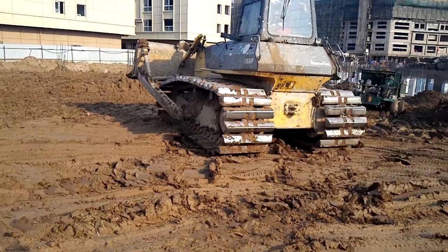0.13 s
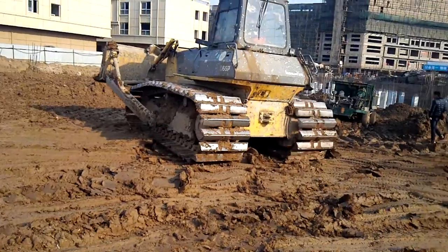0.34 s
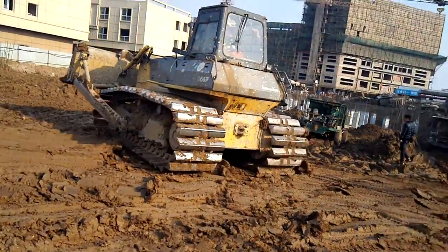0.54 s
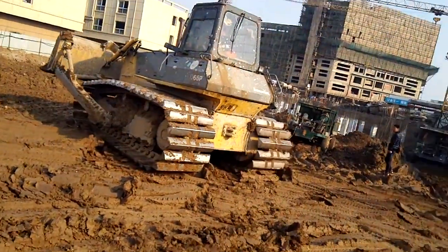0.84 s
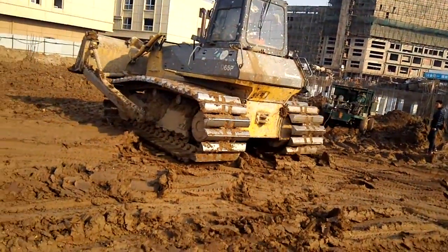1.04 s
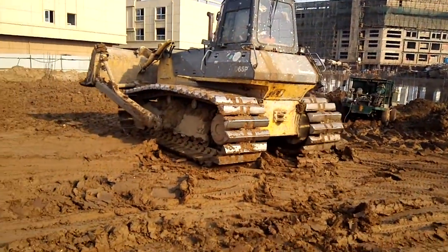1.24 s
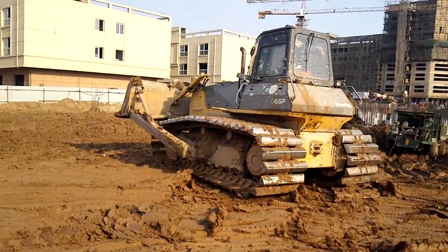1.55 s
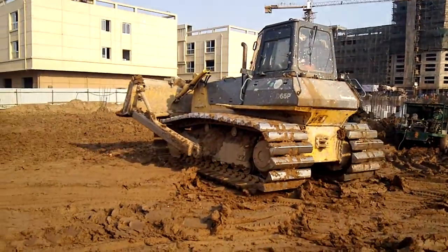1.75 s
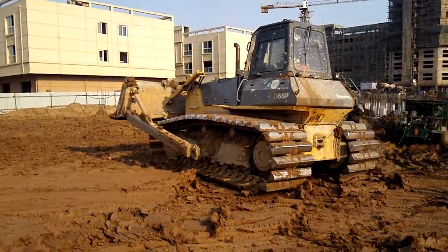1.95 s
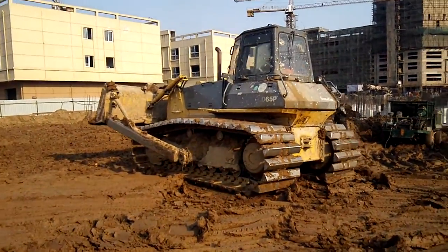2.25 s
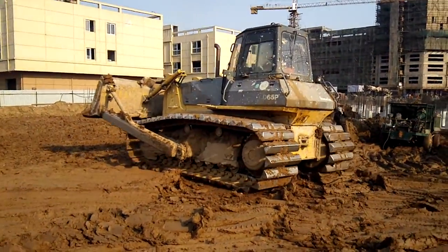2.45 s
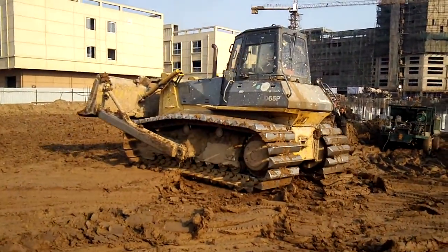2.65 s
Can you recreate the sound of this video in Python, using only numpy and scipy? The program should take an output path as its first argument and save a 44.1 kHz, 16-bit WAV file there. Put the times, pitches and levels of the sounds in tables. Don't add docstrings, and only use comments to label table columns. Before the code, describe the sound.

Bulldozer rolling past on mud, heavy diesel drone with rhythmic track grinding, metallic ticks and squeaks

```python
import sys
import numpy as np
from scipy import signal
from scipy.fft import rfft, irfft, next_fast_len
from scipy.io import wavfile

SR = 44100
rng = np.random.default_rng(int(sys.argv[2]) if len(sys.argv) > 2 else 0)


def invert_db(level):
    return 10 ** (np.asarray(level, dtype=float) / 20)


def wrap_up_sound(samples):
    columns = np.atleast_2d(samples).T
    tamed = np.clip(columns, -1, 1)
    steps = np.round(tamed * 32767).astype(np.int16)
    wavfile.write(sys.argv[1], SR, steps)


N = 123039
FIRING_HZ = 80.56
GRAIN_SPREAD_DB = 4.5


def rms_one(x):
    return x / np.sqrt(np.mean(x ** 2) + 1e-20)


def at_hz(points, hz):
    points = np.array(points)
    return np.interp(np.log(hz + 1), np.log(points[:, 0]), points[:, 1])


def drift(rate_hz):
    r = np.exp(-2 * np.pi * rate_hz * 40 / SR)
    slow = signal.lfilter([1], [1, -2 * r, r * r], rng.standard_normal(N // 40 + 2002))[2000:]
    return np.interp(np.arange(N) / 40, np.arange(len(slow)), rms_one(slow))


def ring(clicks, hz, t60_s):
    r = invert_db(-60 / (t60_s * SR))
    w = 2 * np.pi * hz / SR
    return signal.lfilter([0, np.sin(w)], [1, -2 * r * np.cos(w), r * r], clicks + 1e-18)


def tone(hz, rms_db):
    cycles = np.cumsum(hz * np.ones(N)) / SR + rng.random()
    return np.sqrt(2) * invert_db(rms_db) * np.sin(2 * np.pi * cycles)


def swell(start_s, length_s, power=2):
    out, first = np.zeros(N), int(start_s * SR)
    part = out[first:first + int(length_s * SR)]
    along = np.arange(len(part)) / (length_s * SR)
    skew = 0.95
    part[:] = np.abs(np.sin(np.pi * along ** skew)) ** power
    return out


def patchy_noise(spectrum, low_hz, high_hz):
    hz, out = np.fft.rfftfreq(N, 1 / SR), 0
    white = rfft(rng.standard_normal((3, N)))
    coloured = white * invert_db(at_hz(spectrum, hz)) * (hz > low_hz) * (hz < high_hz)
    half_octaves = 2 * np.log2(hz + 1)
    for centre in np.arange(np.floor(2 * np.log2(low_hz)), 2 * np.log2(high_hz) + 1):
        band = np.cos(np.pi / 2 * np.clip(half_octaves - centre, -1, 1)) ** 2
        out = out + irfft(coloured * band, N) * invert_db(1.71 * drift(4.9))
    return rms_one(out)


def engine_noise():
    # hz, level_db (per Hz)
    roar_spectrum = [(20, -21), (30, -18), (60, -5), (113, -3.5), (151, 0), (212, -5.5), (284, -5),
                     (454, -11.5), (1000, -10.5)]
    # hz, level_db (per Hz)
    clatter_spectrum = [(1000, 0.5), (3000, -2), (4000, -5.5), (4900, -15), (8500, -6.5), (10700, -12),
                        (11200, -15.5), (14500, -34)]
    firing_phase = np.arange(N) / SR * FIRING_HZ % 1
    knock = 1 + 0.1 * (1 - 2 * firing_phase)
    roar = invert_db(-24) * patchy_noise(roar_spectrum, 20, 1000)
    clatter = invert_db(-21.5) * knock * patchy_noise(clatter_spectrum, 1000, 15000)
    return roar + clatter


def moving_lines(lines, base_hz):
    along, out = np.arange(N) / N, np.zeros(N)
    for multiple, first_db, last_db in lines:
        glide_db = first_db + (last_db - first_db) * along
        out += tone(multiple * base_hz, glide_db + 0.7 * drift(3.0))
    return out


def exhaust():
    # multiple (of the firing rate), first_db, last_db (rms)
    exhaust_lines = [(.5, -50, -42), (.7, -48, -39), (1, -25, -26), (7 / 6, -39, -46), (1.5, -44, -38),
                     (2, -22, -27), (7 / 3, -46, -39), (2.5, -36, -41), (8 / 3, -40, -41),
                     (10 / 3, -41, -33), (4, -45, -39), (4.7, -43, -50), (5, -46, -45), (6.5, -50, -43),
                     (10, -52, -42), (11, -49, -39), (13.5, -48, -48), (14, -48, -46), (14.5, -45, -44),
                     (15, -45, -45), (15.5, -50, -45)]
    return moving_lines(exhaust_lines, FIRING_HZ)


def fan():
    # multiple (of the blade rate), first_db, last_db (rms)
    fan_lines = [(1, -32, -23), (2, -40, -30), (3, -41, -50), (4, -45, -46), (5, -48, -45), (6, -47, -46)]
    return moving_lines(fan_lines, 142.8)


def gears():
    # pitch_hz, width_hz, first_db, last_db (rms)
    gear_whines = [(756, 20, -38, -46), (670, 30, -46, -35), (640, 30, -40, -44), (1545, 50, -32, -46),
                   (1663, 15, -43, -35), (1310, 30, -44, -41), (2260, 60, -44, -35), (2110, 60, -46, -37)]
    out = np.zeros(N)
    for hz, width_hz, first_db, last_db in gear_whines:
        whine = rms_one(ring(rng.standard_normal(N), hz, 2.9 / width_hz))
        out += invert_db(np.linspace(first_db, last_db, N) + 3.2 * drift(1.0)) * whine
    return out


def turbo():
    # time_s, pitch_hz
    whistle_path = [
        (0.13, 10560),
        (0.6, 10670),
        (1.0, 10710),
        (1.8, 10760),
        (2.3, 10720),
        (2.79, 10730),
    ]
    whistle_hz = np.interp(np.arange(N) / SR, *np.transpose(whistle_path)) + 22 * drift(40.3)
    out = np.zeros(N)
    for below_hz, relative_db in ((0, 0), (180, -6)):
        out += tone(whistle_hz - below_hz, -33 + relative_db + 3.0 * drift(11.4))
    return out


def struck(blows):
    out, t = np.zeros(N + SR), np.arange(SR // 4) / SR
    bright = signal.butter(2, [3400, 12500], "band", fs=SR, output="sos")
    for start_s, ring_db, hz, t60_s, crack_db in blows:
        shape = (1 - np.exp(-t / 0.00059)) * invert_db(-60 * t / t60_s)
        pair = np.sin(2 * np.pi * hz * t) + 0.87 * np.sin(2 * np.pi * (hz * 1.03 * t + rng.random()))
        crack = signal.sosfilt(bright, rng.standard_normal(len(t)))
        out[int(start_s * SR):][:len(t)] += shape * (invert_db(ring_db) * pair + invert_db(crack_db) * crack)
    return out[:N]


def thuds():
    # start_s, peak_db, pitch_hz, t60_s
    frame_thuds = [
        (1.46, -14, 330, .1),
        (1.605, -17.5, 218, 0.17),
        (1.865, -14, 804, 0.16),
        (2.56, -23, 1240, .1),
    ]
    return struck([(*row, -80) for row in frame_thuds])


def ticks():
    # start_s, peak_db, pitch_hz
    pin_ticks = [(0.407, -7, 8500), (.584, -9, 7600), (0.714, -7, 2800), (0.7655, -8.5, 7800),
                 (.8086, -6, 8000), (.8895, -9, 8900), (1.040, -9.5, 8000), (1.072, -9, 8580),
                 (1.1727, -3.5, 2870), (1.467, -7, 8700), (1.605, -6.5, 8400), (1.7233, -2.5, 8300),
                 (2.2384, -9.5, 9000), (2.2947, -10, 9050)]
    return struck([(start_s, db - 5.5, hz, 0.04, db - 3) for start_s, db, hz in pin_ticks])


def rattles():
    # start_s, length_s, level_db, pitch_hz
    pin_rattles = [(.345, 0.023, -26, 6170), (.35, 0.026, -24.5, 4270), (.626, 0.038, -28, 7660),
                   (.639, 0.019, -15.5, 8700), (.645, 0.019, -19.5, 4200), (.808, 0.0076, -15.5, 3860),
                   (.81, 0.013, -29, 5300), (.888, .012, -26, 5650), (.925, .035, -26, 7900),
                   (.927, .012, -22, 9900), (.93, 0.037, -21, 3680), (1.038, .016, -21.5, 7730),
                   (1.105, 0.024, -31, 7260), (1.173, 0.011, -24, 5800), (1.198, 0.016, -19.5, 6340),
                   (1.218, 0.012, -21, 5870), (1.215, 0.019, -20, 1700), (1.47, .045, -33, 10200),
                   (1.475, 0.032, -27, 5980), (1.49, .03, -20, 1940), (1.725, 0.022, -21, 3800),
                   (1.732, .01, -17.5, 8550), (1.762, 0.012, -19.5, 10160), (1.765, 0.031, -22.5, 5930),
                   (1.772, 0.025, -27, 9600), (1.77, 0.032, -22, 1505), (1.87, 0.058, -24, 7900),
                   (2.04, 0.019, -23.5, 8200), (2.04, 0.01, -29, 9100), (2.60, 0.059, -26, 2090),
                   (2.72, .035, -26, 3700), (2.722, 0.028, -24, 8860), (2.752, .04, -20, 9300)]
    out, t = np.zeros(N + SR), np.arange(SR // 8) / SR
    rise_s, fall_s, relative_width = 0.002, 0.006, 0.07
    for start_s, length_s, db, hz in pin_rattles:
        shape = (1 - np.exp(-t / rise_s)) * np.exp(-np.maximum(t - length_s, 0) / fall_s)
        blows = rng.standard_normal(len(t)) * invert_db(GRAIN_SPREAD_DB * rng.standard_normal(len(t)))
        edges_hz = hz * (1 + relative_width * np.array([-.5, .5]))
        body = signal.butter(2, edges_hz, "band", fs=SR, output="sos")
        out[int(start_s * SR):][:len(t)] += invert_db(db) * shape * rms_one(signal.sosfilt(body, blows))
    return out[:N]


def squeaks():
    # start_s, length_s, low_mode_db, high_mode_db
    bushing_squeaks = [(0.194, 0.032, -25, -40), (.225, .035, -38, -48), (0.322, 0.048, -40, -30),
                       (0.494, .03, -34, -32), (0.515, 0.041, -25, -33), (.575, .03, -28, -45),
                       (0.706, 0.037, -45, -36), (0.764, 0.023, -29, -44), (0.804, 0.027, -28.5, -48),
                       (.88, 0.045, -31, -36), (.915, 0.063, -28, -43), (1.12, 0.044, -34, -45),
                       (1.154, 0.11, -45, -37), (1.37, 0.078, -50, -32), (1.602, 0.045, -32, -36),
                       (1.622, 0.048, -25, -17), (1.885, 0.069, -33.5, -30), (2.136, .09, -46, -32),
                       (2.178, .03, -32, -50), (2.28, 0.027, -30, -42), (2.387, .05, -40, -38),
                       (2.494, 0.062, -34, -28), (2.595, .03, -35, -50), (2.727, 0.1, -40, -34)]
    out = np.zeros(N)
    for column, mode_hz in ((2, 9055), (3, 12285)):
        rubbing = sum(invert_db(row[column]) * swell(row[0], row[1]) for row in bushing_squeaks)
        out += rubbing * tone(mode_hz + 45 * drift(75.0), 9.5 + 4.0 * drift(64.0))
    return out


def grinding():
    # start_s, length_s, level_db, bright_share (0-1), favoured_hz
    link_grinds = [(0.198, 0.023, -18.5, 0.87, 8640), (0.283, 0.091, -19, 0.94, 9100),
                   (0.523, 0.064, -40, 1, 8500), (.62, 0.066, -14, 0.97, 8750),
                   (0.854, 0.07, -18, 0.8, 8600), (0.912, 0.052, -15, 1, 8440), (1.09, 0.051, -21, 1, 7800),
                   (1.192, 0.055, -19.5, 0.5, 8500), (1.457, 0.071, -19.5, 0.84, 9000),
                   (1.615, 0.051, -19.5, 0.69, 8100), (1.747, 0.065, -16, 0.9, 9250),
                   (1.842, 0.13, -18, 0.86, 8650), (2.011, 0.057, -17.5, 0.92, 9150),
                   (2.14, 0.066, -20.5, 0.74, 8500), (2.286, 0.098, -22.5, 0.77, 8800),
                   (2.561, 0.11, -22.5, 0.46, 8900), (2.691, 0.071, -21, 0.53, 8600)]
    rows = np.array(link_grinds)
    grains_per_s, ring_cycles = 3000, 70
    present = rng.random(N) < grains_per_s / SR
    sizes = invert_db(GRAIN_SPREAD_DB * np.minimum(rng.exponential(1, N), 4)) * rng.choice([-1, 1], N) * present
    dealt = rng.integers(0, 4, N)
    pitches = np.r_[np.geomspace(3100, 4500, 10), np.geomspace(5400, 14000, 30)]
    humps = np.array([invert_db(db) * swell(start_s, length_s, power=0.59)
                      for start_s, length_s, db, *_ in link_grinds])
    humps = invert_db(2.9 * drift(64.0)) * humps

    share = np.clip(rows[:, 3:4], 0, 1)
    octaves_off = np.log2(pitches / rows[:, 4:])
    favour = np.exp(-.5 * (octaves_off / 0.16) ** 2) + invert_db(-15)
    weight = np.where(np.arange(40) < 10, np.sqrt(1 - share), np.sqrt(share) * favour)
    weight = weight * invert_db(3.0 * rng.standard_normal((len(rows), 40)))
    weight /= np.sqrt(np.sum(weight ** 2, 1, keepdims=True))

    out = np.zeros(N)
    for k, hz in enumerate(pitches):
        clicks = sizes * (dealt == k % 4)
        t60_s = ring_cycles / hz
        ring_rms = np.sqrt(np.mean(clicks ** 2) * t60_s * SR / 23.0)
        out += ring(clicks * (weight[:, k] @ humps), hz, t60_s) / ring_rms
    return out


def scattered(x):
    size = next_fast_len(N + 4096)
    decay = np.exp(-np.arange(4096) / (0.008 * SR))
    tail = rfft(rng.standard_normal((2, 4096)) * decay, size)
    tail /= np.abs(tail)
    tail[1] = np.where(np.fft.rfftfreq(size, 1 / SR) < 2500, -tail[0], tail[1])
    return np.vstack([x, irfft(rfft(x, size) * tail, size)[:, :N]])


def ports(three):
    # hz, likeness (0-1)
    port_likeness = [(60, .99), (170, .99), (370, .8), (910, .74), (2250, .35), (5550, .1), (11000, .15),
                     (12500, .45)]
    # hz, left_minus_right_db
    port_balance = [(60, -1), (280, -1.5), (620, 6.5), (1340, 2.5), (2910, 7.5), (5000, -7.5), (9000, 4),
                    (13000, 3)]
    # hz, left_lead_rad
    port_lead = [(100, 0), (2240, 0), (3700, 1.5), (10000, 1), (12000, 4)]
    hz = np.fft.rfftfreq(N, 1 / SR)
    shared, left, right = rfft(three)
    alike = np.clip(at_hz(port_likeness, hz), 0, 1)
    side = invert_db(at_hz(port_balance, hz) / 2) * np.exp(.5j * at_hz(port_lead, hz))
    left_port = (np.sqrt(alike) * shared + np.sqrt(1 - alike) * left) * side
    right_port = (np.sqrt(alike) * shared + np.sqrt(1 - alike) * right) / side
    return irfft([left_port, right_port], N)


def scene():
    machine = exhaust() + fan() + gears() + turbo()
    track = thuds() + ticks() + rattles() + squeaks() + grinding()
    return ports(engine_noise() + scattered(machine + track))


def band_limit(x):
    return signal.sosfilt(signal.butter(12, 14340, fs=SR, output="sos"), x)


def record(dry):
    t = np.arange(N) / SR - 0.116
    floor = invert_db(-20.5)
    fade = (t > 0) * (floor + (1 - floor) * np.clip(t / 0.26, 0, 1) ** 1.26)
    clipped = np.clip(dry * fade, -.93, .93)
    top_cut = signal.cheby2(10, 60, 15040, fs=SR, output="sos")
    return band_limit(signal.sosfilt(top_cut, clipped))


dry = scene()
out = record(dry)
wrap_up_sound(out)
```